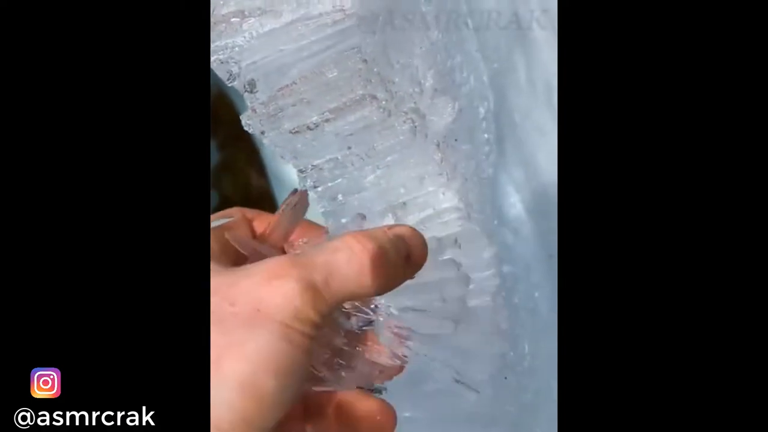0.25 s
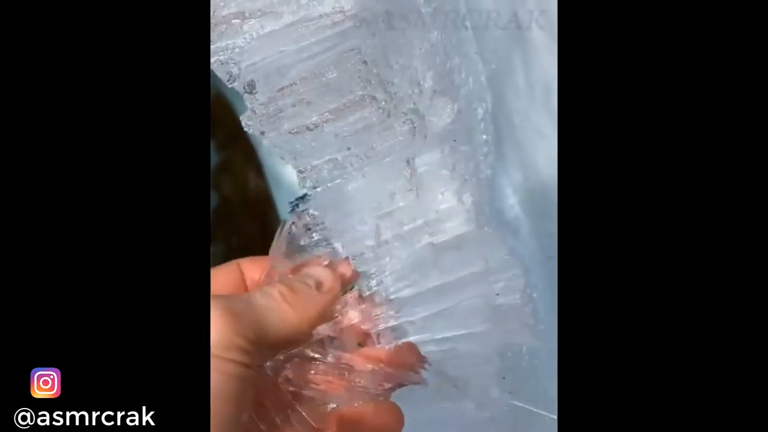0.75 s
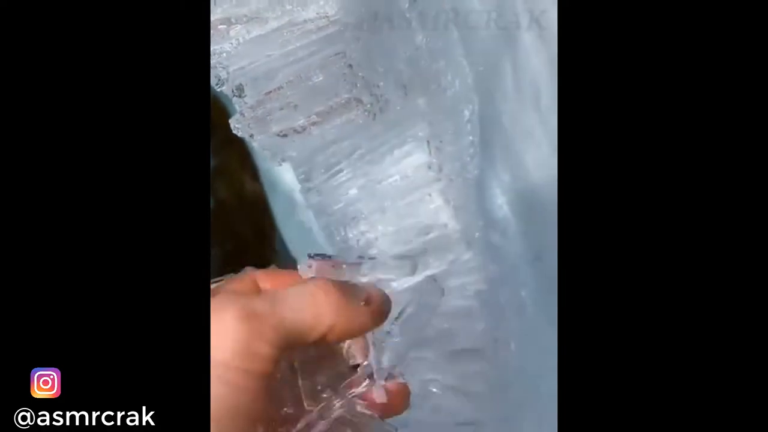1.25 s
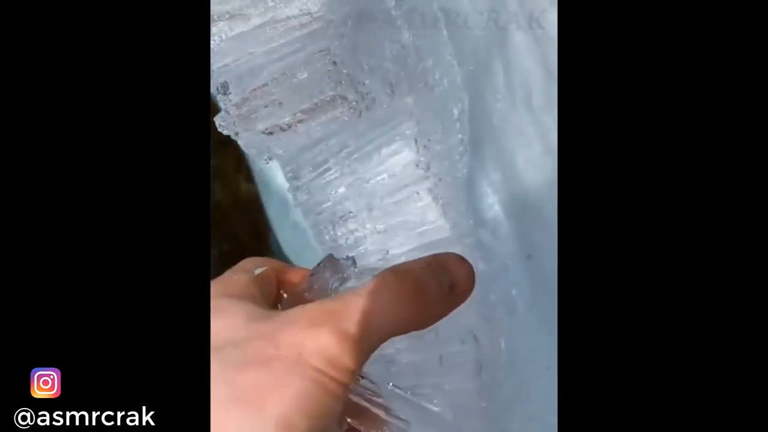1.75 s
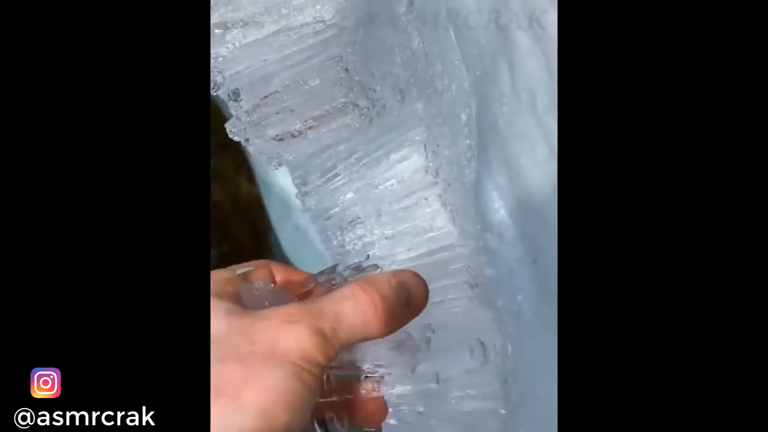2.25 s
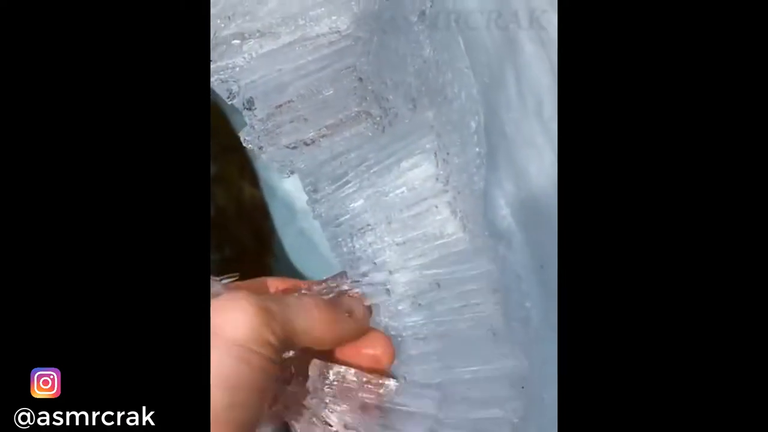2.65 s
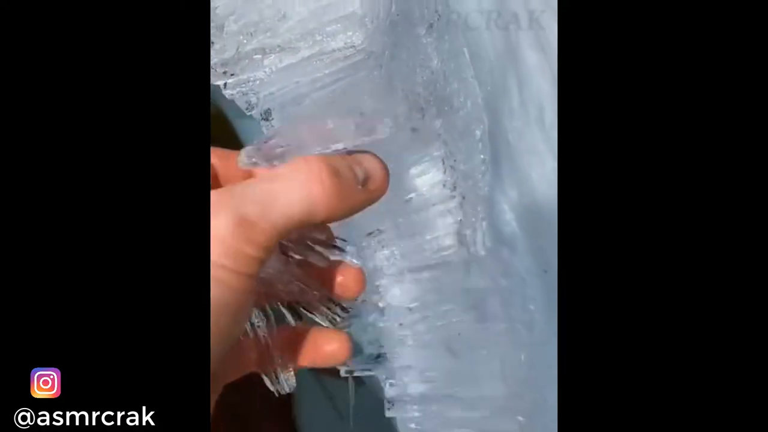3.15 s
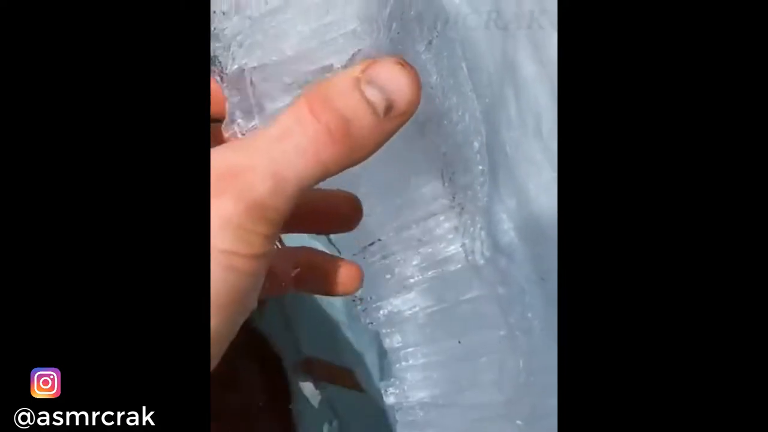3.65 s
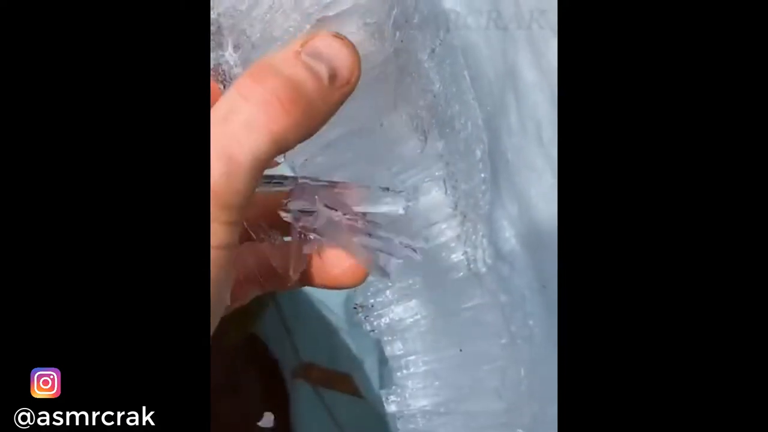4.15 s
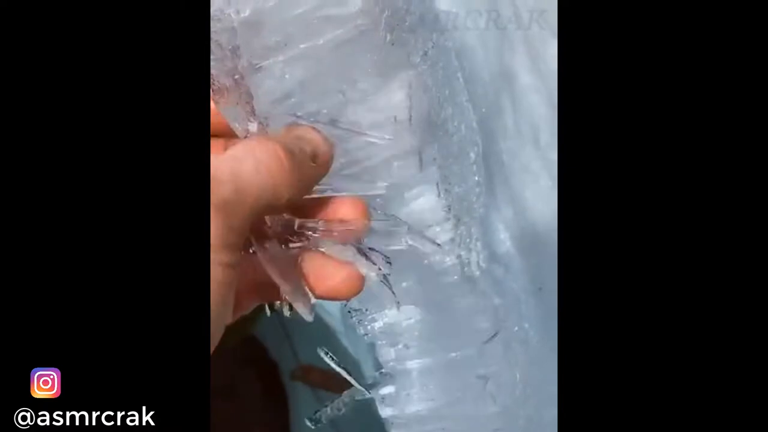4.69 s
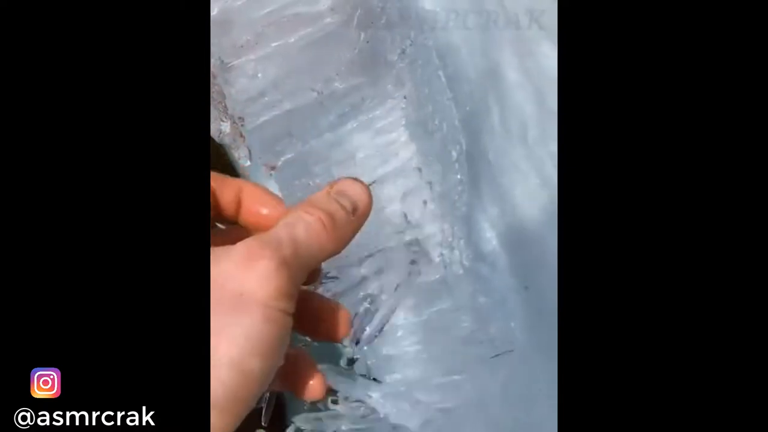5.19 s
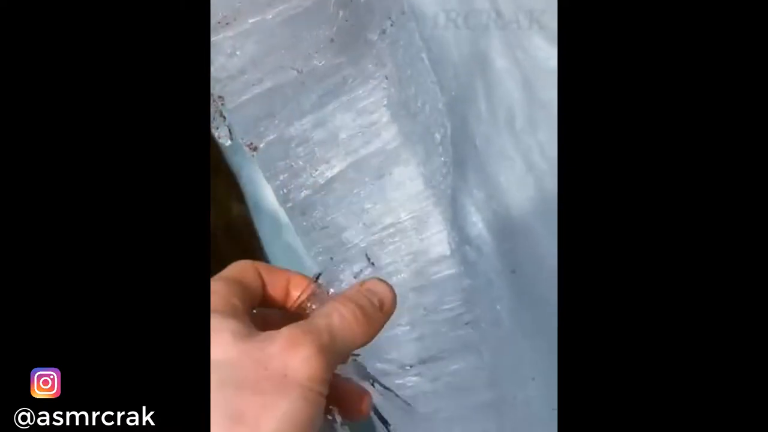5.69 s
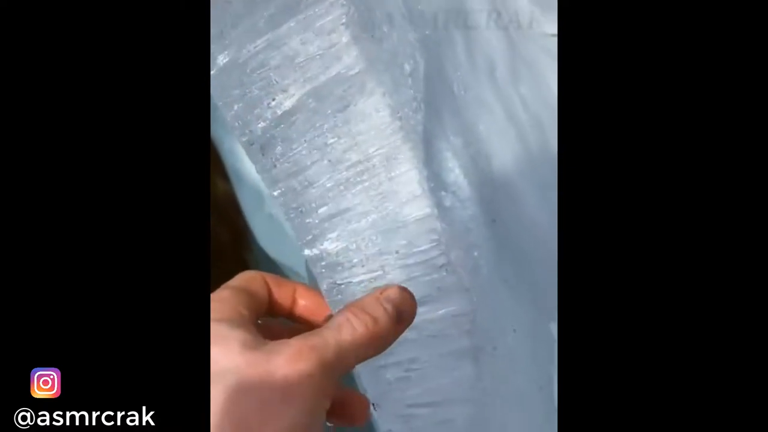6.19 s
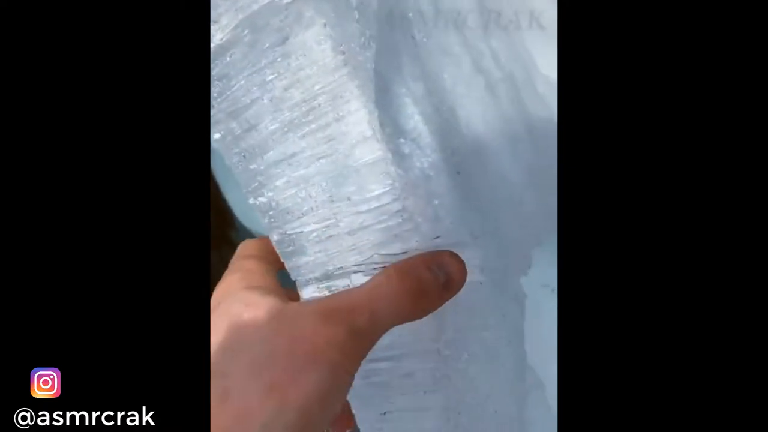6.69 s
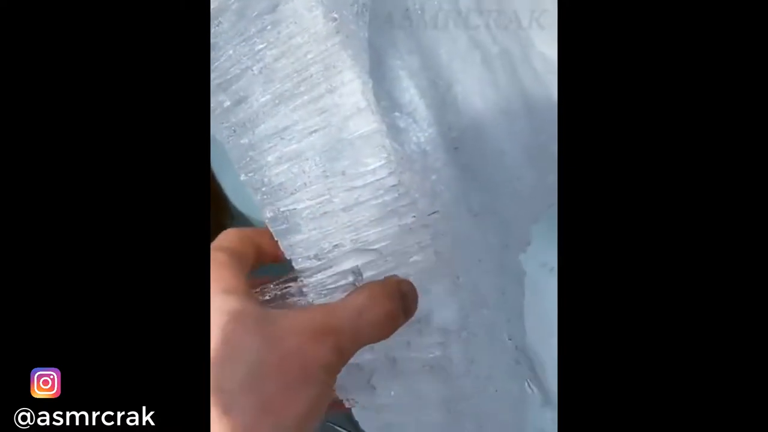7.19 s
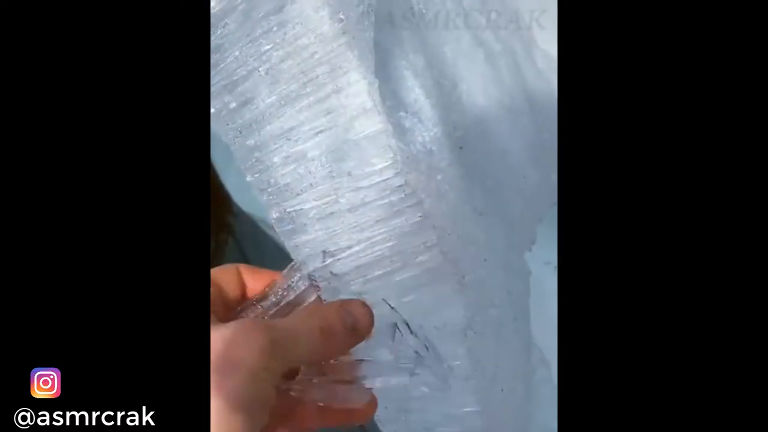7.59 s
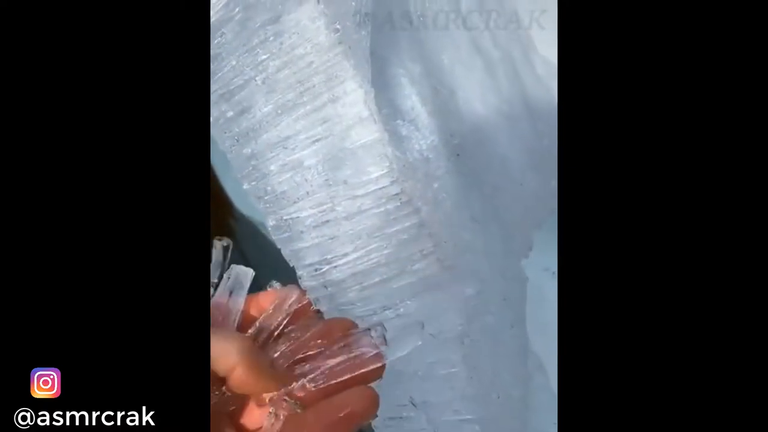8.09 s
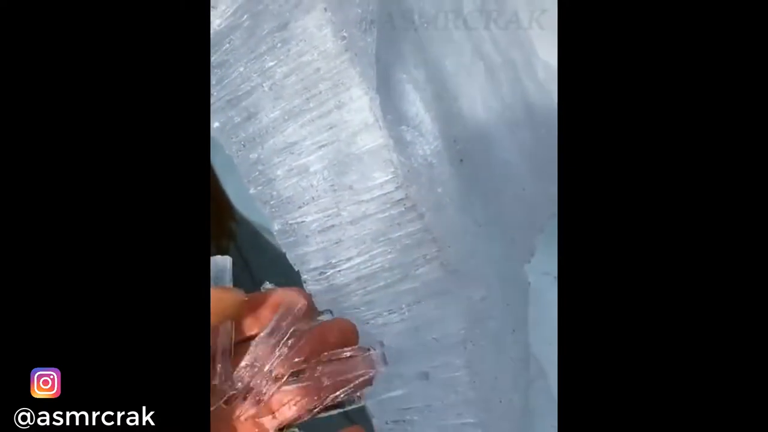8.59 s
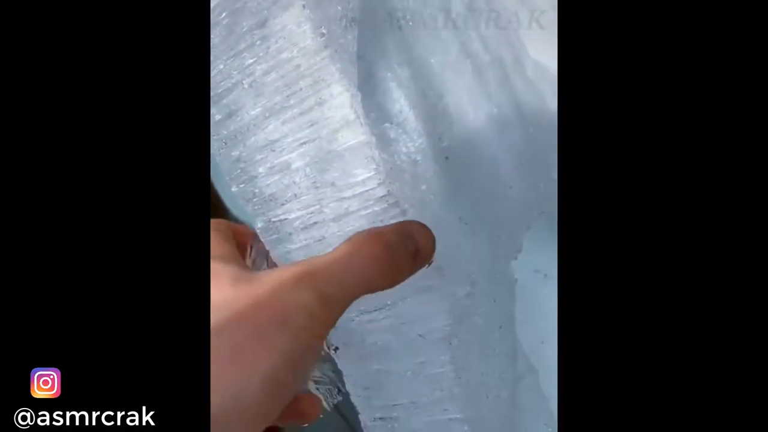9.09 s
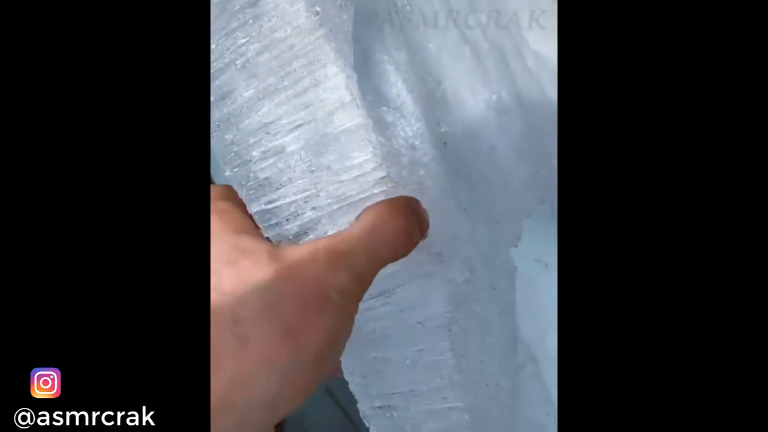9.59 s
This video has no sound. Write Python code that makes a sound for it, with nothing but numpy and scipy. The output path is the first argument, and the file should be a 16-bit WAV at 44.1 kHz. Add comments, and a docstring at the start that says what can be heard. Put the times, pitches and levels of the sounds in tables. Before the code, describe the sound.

Fingers pull apart brittle ice columns in a near-constant glassy rattle, with sharp snaps, small clinks and brief high rings, close up outdoors.

```python
"""Candle ice pulled apart by hand

A hand presses into a wall of candle ice and pulls loose columns of crystal away. Swarms of short tones
and noise make the rattle and rub; bursts of noise make the snaps; brief or longer tones make clinks and rings.
Swelling noise makes the crunch of crushed handfuls and, through resonances, the hollow gaps.
The ice wall answers with short noisy tails. Outdoor air is faint steady noise; low fading tones are bumps."""
import sys
import numpy as np
from scipy import signal
from scipy.fft import rfft, irfft, next_fast_len
from scipy.io import wavfile
from scipy.ndimage import uniform_filter1d, map_coordinates

SR = 44100
rng = np.random.default_rng(int(sys.argv[2]) if len(sys.argv) > 2 else 0)


def log_audio(samples):
    """Write samples as a 16-bit WAV file to the path given in sys.argv[1]."""
    # one column per channel
    frames = np.atleast_2d(samples).T
    # limit to full scale, then quantise
    limited = np.clip(frames, -1, 1)
    pcm = np.round(limited * 32767).astype(np.int16)
    wavfile.write(sys.argv[1], SR, pcm)


N = 434385  # length in samples


def amp(db):
    """Turn decibels into a gain."""
    return 10 ** (np.asarray(db) / 20)


def unit(x):
    """Scale to an rms (average strength) of 1."""
    return x / np.sqrt(np.mean(x ** 2) + 1e-20)


def along(points, hz):
    """Read a curve of (Hz, value) points on a log frequency axis."""
    point_hz, values = np.transpose(points)
    return np.interp(np.log(hz + 1), np.log(point_hz), values)


def curve(rows):
    """Join (s, value) rows by straight lines, one value per sample."""
    return np.interp(np.arange(N) / SR, *np.transpose(rows))


def filtered(x, response):
    """Multiply the spectrum of x by a response that depends on frequency."""
    padded = next_fast_len(N + SR // 4)
    spectrum = rfft(x, padded) * response(np.fft.rfftfreq(padded, 1 / SR))
    return irfft(spectrum, padded)[..., :N]


def coloured(x, spectrum):
    """Shape x by (Hz, dB) points, then scale it to rms 1."""
    return unit(filtered(x, lambda hz: amp(along(spectrum, hz))))


def place(times, sounds, spread):
    """Add rows of sound at their times, each from its own random direction: (mid, side)."""
    first = (np.maximum(times, 0) * SR).astype(int)[:, None]
    index = first + np.arange(sounds.shape[1])
    pan = spread * rng.standard_normal((len(times), 1))
    return np.array([np.bincount(index.ravel(), s.ravel(), N)[:N] for s in (sounds, sounds * pan)])


# colour of the outdoor air: pitch_hz [Hz], gain_db [dB, relative]
AIR_COLOUR = [(20, -18.5), (60, -2.5), (170, 0.6), (1500, 1.5), (3200, -6.5)]


def air():
    """Outdoor air is a faint, steady hiss of coloured noise."""
    return amp(-58.0) * coloured(rng.standard_normal(N), AIR_COLOUR)


def wobble(rate):
    """Draw a smooth random curve through `rate` random points a second."""
    points = rng.standard_normal(N // 100)
    return map_coordinates(points, [np.arange(N) * rate / SR], mode="wrap")


# a bundle of columns slips under the fingers; levels are before the layers are mixed:
# start_s [s], swell_s [s], slide_s [s], small_crystals_db [dB], thick_columns_db [dB]
SLIPS_OF_ICE = [(0, .004, .006, -37.5, -48), (.04, .05, .005, -34, -45), (.25, .06, .09, -39, -51.5),
                (.795, .052, .006, -36, -53), (1.022, .01, .025, -45.5, -66), (1.1, .06, .07, -43.5, -54),
                (1.256, .014, .075, -31.5, -50), (1.415, .012, .21, -44, -63), (1.78, .098, .004, -34, -53),
                (2.005, .04, .08, -32, -40.5), (2.22, .018, .035, -41.5, -46.5),
                (2.35, .048, .004, -38.5, -51.5), (2.53, .02, .008, -37, -54),
                (2.595, .006, .014, -35.5, -47.5), (2.662, .022, .016, -37.5, -60.5),
                (2.744, .03, .014, -37.5, -53.5), (2.896, .012, .042, -38.5, -61),
                (3.195, .006, .035, -41, -55), (3.402, .015, .075, -36.5, -62),
                (3.52, .034, .075, -38, -51.5), (3.635, .012, .12, -35, -59),
                (3.843, .01, .014, -35, -59.5), (4.027, .01, .024, -32.5, -51),
                (4.151, .015, .02, -41.5, -64), (4.275, .075, .035, -32, -46),
                (4.425, .009, .095, -36.5, -50), (4.595, .08, .014, -30.5, -47),
                (4.844, .008, .016, -30, -50), (4.905, .048, .006, -30.5, -54),
                (4.99, .006, .025, -34, -53.5), (5.075, .011, .137, -35.5, -54),
                (5.322, .003, .004, -32.5, -48), (5.345, .003, .02, -31.5, -56),
                (5.401, .01, .045, -37, -62), (5.47, .036, .085, -34.5, -60),
                (5.628, .009, .04, -35.5, -54), (5.832, .012, .012, -32.5, -53),
                (5.972, .028, .01, -35.5, -54), (6.14, .007, .044, -26.5, -40), (7.195, .04, .07, -41, -60),
                (7.51, .067, .07, -38.5, -57), (7.63, .03, .01, -44, -53), (7.7, .012, .05, -38.5, -59.5),
                (8.232, .005, .012, -32, -52), (8.255, .015, .02, -29.5, -48), (8.31, .02, .04, -41, -50),
                (8.398, .004, .005, -36, -50.5), (8.576, .017, .012, -36.5, -59),
                (8.9, .004, .06, -42, -55.5), (9.562, .004, .066, -43.5, -61),
                (9.755, .03, .014, -41.5, -54)]
# steady pressure of the hand, which keeps the small crystals jostling:
# time_s [s], level_db [dB, before catching and layer mixing]
HAND_PRESSURE = [(0.5, -45.5), (1.0, -51), (1.95, -48), (2.2, -43), (2.87, -48.5), (3.05, -43.5),
                 (3.7, -45), (4.2, -49), (4.75, -44.5), (5.6, -40.5), (6.11, -46), (6.22, -39.5),
                 (6.9, -42.5), (7.1, -46.5), (9.1, -47.5), (9.4, -55)]


def effort(slip_db, grip_db, settle_s, lag_s, catch_db=1.56, catch_rate=40):
    """Level in dB of the moving ice: each slip swells, slides and settles, on top of the steady grip."""
    t = np.arange(0, N, 32) / SR  # a coarse clock is enough for these slow curves
    start, swell, slide = np.transpose(SLIPS_OF_ICE)[:3, :, None]
    age = t - lag_s - start
    settling_s = np.maximum(age - swell - slide, 0)
    slips = amp(slip_db[:, None] - 60 * settling_s / settle_s) * np.clip(age / swell, 0, 1)
    slip_power = curve(np.column_stack([t, (slips ** 2).sum(0)]))
    grip = amp(np.interp(t, *np.transpose(HAND_PRESSURE)) + grip_db)
    # under steady pressure the pieces catch and let go at random
    grip = curve(np.column_stack([t, grip])) * amp(catch_db * wobble(catch_rate))
    return 10 * np.log10(grip ** 2 + slip_power)


def contacts(level_db, spectrum, low_hz, high_hz, t60, scatter_db, crowding, turnover, count, size, order=4):
    """Rods knock together, each with several modes; harder handling brings more and louder contacts."""
    # spread the contacts over time so that they crowd where the effort is high
    busy = np.cumsum(amp(crowding * level_db))
    share = (np.arange(count) + rng.random(count)) / count
    at = np.searchsorted(busy, share * busy[-1]).clip(0, N - 1)
    times = at / SR + rng.uniform(-1, 1, count) * N / SR / count
    # a few rods chatter again and again, then others take their place
    rod = (times * turnover + 20 * rng.random(count)).astype(int) % count
    hz = low_hz[at] + (high_hz - low_hz[at]) * rng.random((order, count))[:, rod]
    t = (np.arange(size) / SR).astype(np.float32)
    # t60 is the typical time to fade by 60 dB; each contact varies around it
    life = (t60 * np.exp(.5 * rng.standard_normal((count, 1)))).astype(np.float32)
    strength = amp(scatter_db * np.minimum(rng.exponential(size=(count, 1)), 3.5))
    modes = np.cos(2 * np.pi * hz[..., None].astype(np.float32) * t).sum(0)
    modes = modes * np.exp(-np.float32(np.log(1000)) * t / life)
    # the shorter the typical ring, the quicker the touch; the last factor fades to silence
    touch = (1 - np.exp(-t / (.015 * t60))) * (1 - t / t[-1])
    swarm = coloured(place(times, strength * modes * touch, spread=.25), spectrum)
    # the contacts of one moment share the energy that the hand puts in
    window = int(.032 * SR)
    power = np.abs(uniform_filter1d(uniform_filter1d(swarm[0] ** 2, window), window))
    return swarm / np.sqrt(power + 1e-4) * amp(level_db)


# deepest note of the crystals under the fingers, set by their length: time_s [s], pitch_hz [Hz]
DEEPEST_NOTE = [(1.15, 2610), (1.7, 3490), (2.1, 2817), (3.65, 2762), (4.2, 3790), (4.5, 2775), (5.7, 2860),
                (6.4, 4184), (7.3, 3556), (8.4, 3936)]
# colour of the small crystals: pitch_hz [Hz], gain_db [dB, relative]
CRYSTAL_COLOUR = [(1500, -52), (2500, -8.5), (3200, -1.5), (4100, 0), (6500, 2.5), (9700, 0)]


def rattle(stick_db=1.5, splinter_db=-7.0, tick_db=-3.0, tinkle_db=-5.5, rub_db=-2.5):
    """Splinters, damped ticks, freer tinkles and the rub of wet faces all follow the hand's effort."""
    slip_levels = np.array(SLIPS_OF_ICE)[:, 3]
    effort_db = effort(slip_levels, grip_db=0, settle_s=.2, lag_s=0)
    deepest_hz = curve(DEEPEST_NOTE)
    slip_db = effort_db + stick_db * wobble(100)  # the two shortest sounds also flutter quickly
    splinters = contacts(slip_db, CRYSTAL_COLOUR, deepest_hz, 10500, t60=0.00076, scatter_db=4,
                         crowding=.5, turnover=900, count=4000, size=128)
    ticks = contacts(slip_db, CRYSTAL_COLOUR, deepest_hz, 10200, t60=0.016, scatter_db=3.5,
                     crowding=.3, turnover=380, count=2200, size=500)
    tinkles = contacts(effort_db, CRYSTAL_COLOUR, deepest_hz, 9800, t60=0.094, scatter_db=4.5,
                       crowding=.15, turnover=80, count=640, size=3600)
    hiss = rng.standard_normal((2, N)) * [[1], [.25]]  # mid, weaker side
    rub = coloured(hiss, [(1200, -26.5), (2800, -26.5), (3900, -5.5)]) * amp(effort_db)
    knocks = amp(splinter_db) * splinters + amp(tick_db) * ticks + amp(tinkle_db) * tinkles
    return knocks + amp(rub_db) * rub


# colour of the thick columns: pitch_hz [Hz], gain_db [dB, relative]
COLUMN_COLOUR = [(900, -27), (1400, -13), (2050, -6.5), (2800, -1.5), (3500, -4), (5000, -30.5)]


def columns(level_db=0.0):
    """Thick columns clatter lower than the small crystals, start late and rock for longer."""
    slip_levels = np.array(SLIPS_OF_ICE)[:, 4]
    # steady pressure hardly moves the thick columns
    effort_db = effort(slip_levels, grip_db=-25, settle_s=.38, lag_s=.008)
    clatter = contacts(effort_db, COLUMN_COLOUR, np.full(N, 1500), 3500, t60=.012, scatter_db=3.5,
                       crowding=.5, turnover=400, count=3000, size=600)
    return amp(level_db) * clatter


# ringing of the ice wall: pitch_hz [Hz], t60_s [s to fade by 60 dB, apart from the build-up]
WALL_RINGING = [(2000, 0.039), (4500, 0.016)]


def wall(x, build_s=0.01, count=40):
    """Knocks spread through the packed columns, swell just after the blow and fade, the treble first."""
    noise = rng.standard_normal((count, 2, SR // 4))
    hz, t, z = signal.stft(noise, SR, nperseg=256)
    fade = amp(-60 * t / along(WALL_RINGING, hz)[:, None])
    tails = signal.istft(z * fade, SR, nperseg=256)[1]
    tail_t = np.arange(tails.shape[-1]) / SR
    tails = tails * (1 - np.exp(-(tail_t / build_s) ** 2))
    out = np.zeros((2, N + SR))
    # each stretch of time takes new paths through the ice
    for part, tail in zip(np.array_split(np.arange(N), count), tails):
        answer = signal.fftconvolve(x[:1, part], tail / np.linalg.norm(tail[0]), axes=1)
        out[:, part[0]:][:, :answer.shape[1]] += answer
    return out[:, :N] * [[1], [.4]]  # mid, weaker side


# jolts of the camera: start_s [s], level_db [dB, before the rise and fade]
CAMERA_JOLTS = [(0.02, -51), (0.325, -49), (0.975, -40), (1.065, -41.5), (1.47, -55), (1.78, -48)]


def bumps(hz=58, rise=0.0064, t60=0.2):
    """Each jolt of the camera is a low thud: a deep tone that rises quickly and fades."""
    start_s, level_db = np.transpose(CAMERA_JOLTS)[:, :, None]
    age = np.maximum(np.arange(N) / SR - start_s, 0)
    envelope = amp(level_db - 60 * age / t60) * (1 - np.exp(-age / rise))
    return (np.sin(2 * np.pi * hz * age) * envelope).sum(0)


def strike(times, db, hits):
    """Start each hit at its time and give it its peak level."""
    level = hits / np.abs(hits).max(1, keepdims=True) * amp(db[:, None])
    return place(times, level, spread=0.067)


def cracks(count):
    """Make rows of bright fracture noise, and their time axis."""
    t = np.arange(SR // 20) / SR
    sos = signal.butter(4, [2700, 9900], "band", fs=SR, output="sos")
    return unit(signal.sosfilt(sos, rng.standard_normal((count, len(t))))), t


# dry fractures: middle_s [s], peak_db [dB], centre_hz [Hz, of the crack's colour]
FRACTURES = [(0.373, -34, 7510), (0.4435, -20, 6040), (0.768, -24.5, 7180), (2.3735, -22.5, 8600),
             (2.5202, -16, 8700), (2.6016, -12, 8400), (2.7539, -17.5, 6040), (2.773, -27, 5800),
             (2.9054, -13.5, 7500), (2.938, -18, 5900), (3.8063, -16, 7660), (3.848, -17, 6100),
             (3.945, -15.5, 5530), (4.359, -10.5, 8800), (4.8533, -11, 6600), (4.9167, -15, 4900),
             (5.326, -16, 5000), (5.4247, -19, 5250), (5.7996, -12.5, 7050), (5.844, -23.5, 4500),
             (5.999, -19.5, 9200), (6.1316, -12.5, 6900), (6.1476, -13, 7500), (7.4613, -25, 4840),
             (8.2384, -10, 6400), (8.2417, -12, 5600), (8.2823, -12, 5900), (8.847, -23.5, 9300),
             (9.1857, -25, 7900), (9.566, -27.5, 7340), (9.7867, -26, 7500)]
FRACTURE_S = 0.00073  # time constant in s of the noise burst, even on both sides of its middle


def snaps(width=0.21, broad_share=0.13):
    """The bond between two columns breaks: a very short noise burst with its own colour, dull or bright."""
    middle_s, peak_db, centre_hz = np.transpose(FRACTURES)
    crack, t = cracks(count=len(middle_s))
    burst = crack * np.exp(-np.abs(t - t.mean()) / FRACTURE_S)
    hz = np.fft.rfftfreq(len(t), 1 / SR)
    # a bump of colour around the centre, over a weak broad floor
    colour = broad_share + np.exp(-(np.log((hz + 1) / centre_hz[:, None]) / width) ** 2)
    return strike(middle_s - t.mean(), peak_db, irfft(rfft(burst) * colour))


# freed rods that ring on:
# start_s [s], level_db [dB, main tone before its rise and fade], pitch_hz [Hz], t60_s [s to fade by 60 dB]
RINGING_RODS = [(0.455, -38, 5700, 0.24), (2.548, -33, 6345, 0.14), (2.909, -23, 8100, 0.061),
                (3.535, -29, 6500, 0.11), (3.856, -26, 6120, 0.1), (6.896, -23, 8920, 0.11),
                (6.995, -39, 4610, 0.18), (7.248, -39, 4060, 0.24), (7.278, -38, 3740, 0.12),
                (8.708, -43.5, 4250, 0.16), (8.9016, -10, 5150, 0.014), (9.066, -31, 4580, 0.16),
                (9.098, -37.5, 4580, 0.23), (9.198, -45, 4600, 0.16)]


def rings(beat_hz=45, pair_share=0.35):
    """A rod that is not quite round rings in a close pair of bending modes."""
    start_s, level_db, hz, t60 = np.transpose(RINGING_RODS)[:, :, None]
    t = np.arange(SR // 3) / SR
    split_hz = beat_hz * (.5 + rng.random(hz.shape))  # beat_hz is the average
    pair = np.sin(2 * np.pi * hz * t) + pair_share * np.sin(2 * np.pi * (hz + split_hz) * t)
    envelope = amp(level_db - 60 * t / t60) * (1 - np.exp(-t / 0.0007))
    return place(start_s[:, 0], pair * envelope, spread=0.055)


# rods that strike one another: start_s [s], peak_db [dB], pitch_hz [Hz]
STRUCK_RODS = [(1.1763, -22, 4400), (1.2654, -19, 7100), (1.305, -17, 2660), (1.3093, -23, 2160),
               (2.2515, -18.5, 8950), (2.9087, -17.5, 7960), (4.037, -16.5, 6100), (4.6242, -16, 4270),
               (4.677, -14, 5580), (4.686, -17, 6130), (4.9928, -18, 3800), (5.0098, -17.5, 3740),
               (5.179, -20, 3850), (5.2833, -23.5, 4050), (5.291, -26, 3280), (5.347, -16.5, 4400),
               (5.5685, -15.5, 4330), (6.148, -24.5, 2720), (6.5924, -21, 5000), (7.7083, -24, 4240),
               (8.4034, -13.5, 6200)]


def clinks(crack_t60=0.0079, ring_t60=0.0076, crack_share=0.23, rise=0.0004):
    """A contact cracks and rings a rod for a moment, until the fingers damp it."""
    start_s, peak_db, hz = np.transpose(STRUCK_RODS)
    crack, t = cracks(count=len(start_s))
    ring = np.sin(2 * np.pi * hz[:, None] * t) * amp(-60 * t / ring_t60)
    body = ring + crack_share * crack * amp(-60 * t / crack_t60)
    return strike(start_s, peak_db, body * (1 - np.exp(-t / rise)))


# handfuls that give way: start_s [s], level_db [dB], rise_s [s], t60_s [s to fade by 60 dB]
HANDFULS = [(2.012, -40, 0.038, 0.69), (6.158, -47.5, 0.016, 1)]
# colour of the crunch: pitch_hz [Hz], gain_db [dB, relative]
CRUNCH_COLOUR = [(150, -24), (600, -1), (1400, -2), (2300, 7), (4500, -29)]


def crushes():
    """A whole handful gives way: the crunch swells and dies in the mass of the ice."""
    t = np.arange(N) / SR
    swell = np.zeros(N)
    for start_s, level_db, rise, t60 in HANDFULS:
        fading_s = np.maximum(t - start_s - 2 * rise, 0)  # full for one rise time, then fading
        swell += amp(level_db) * np.clip((t - start_s) / rise, 0, 1) * amp(-60 * fading_s / t60)
    return swell * coloured(rng.standard_normal(N), CRUNCH_COLOUR)


# resonances of the gap behind the columns: pitch_hz [Hz]
GAP_RESONANCES = [1769, 1913, 2063, 2194]


def gap(x, width_hz=110):
    """Pass x through the close resonances of the gap behind the columns, twice over, at rms 1."""
    def resonances(hz):
        damping = 1j * hz * width_hz
        return sum(damping / (mode ** 2 - hz ** 2 + damping) for mode in GAP_RESONANCES) ** 2
    return unit(filtered(x, resonances))


# gaps that ring as a piece comes loose: start_s [s], level_db [dB, before the rise and fade]
OPENED_GAPS = [(2.77, -49), (4.355, -35), (5.805, -46.5), (6.2, -43), (9.77, -54)]


def hollows(rise=0.015, t60=0.42):
    """An opened gap swells and dies in its own resonances."""
    start_s, level_db = np.transpose(OPENED_GAPS)[:, :, None]
    age = np.maximum(np.arange(N) / SR - start_s, 0)
    envelope = amp(level_db - 60 * age / t60) * (1 - np.exp(-age / rise))
    return gap(rng.standard_normal(N)) * envelope.sum(0)


# stereo width: pitch_hz [Hz], side_gain_db [dB]
STEREO_WIDTH = [(3000, -44), (4500, 1)]


def scene():
    """Mix the ice in front of the microphone; mainly its treble spreads left and right."""
    loose = rattle() + columns()
    hits = snaps() + clinks()
    answer = wall(amp(-6.5) * hits + amp(-12.0) * loose)
    mid, side = loose + hits + rings() + answer
    mid = mid + hollows() + crushes() + bumps() + air()
    # the two microphone ports sit close together: a quarter-cycle turn makes them differ mostly in phase
    side = filtered(side, lambda hz: 1j * amp(along(STEREO_WIDTH, hz)))
    return np.array([mid + side, mid - side])


TOP_HZ = 9660  # upper band limit of the camera


def record(dry):
    """The camera's very steep low-pass filter removes almost everything above its band limit."""
    return filtered(dry, lambda hz: 1 / np.sqrt(1 + (hz / TOP_HZ) ** 260))


dry = scene()
out = record(dry)
log_audio(out)
```